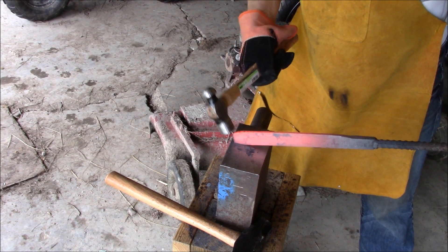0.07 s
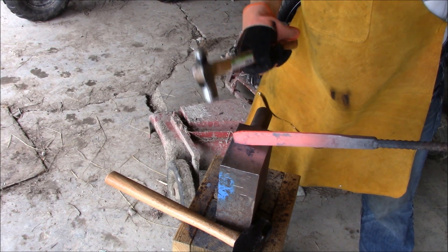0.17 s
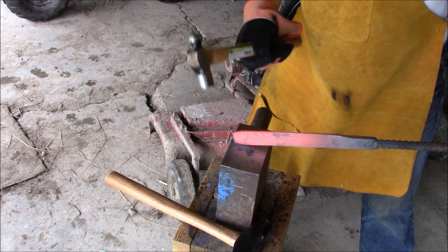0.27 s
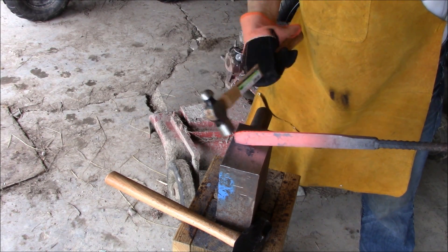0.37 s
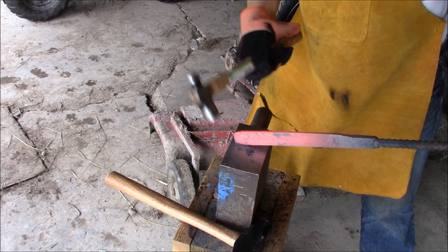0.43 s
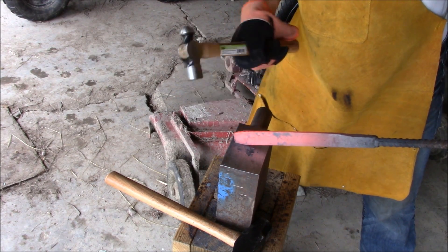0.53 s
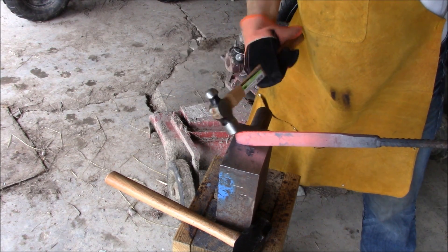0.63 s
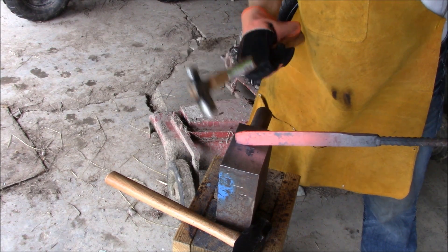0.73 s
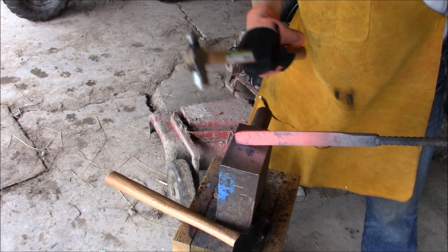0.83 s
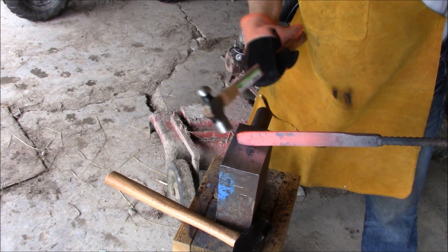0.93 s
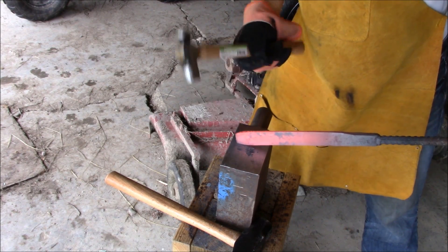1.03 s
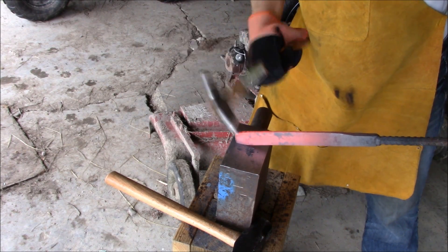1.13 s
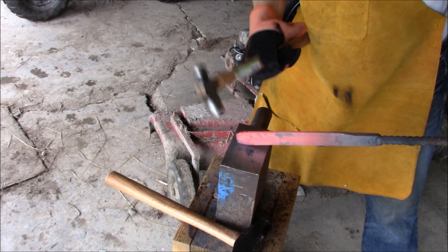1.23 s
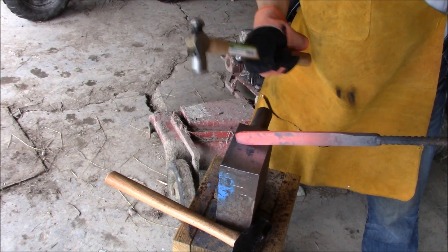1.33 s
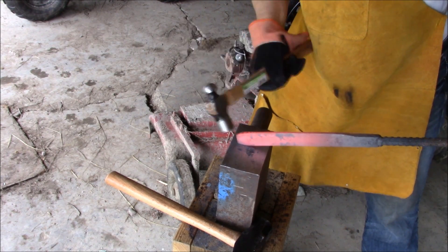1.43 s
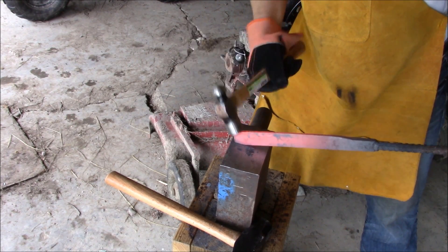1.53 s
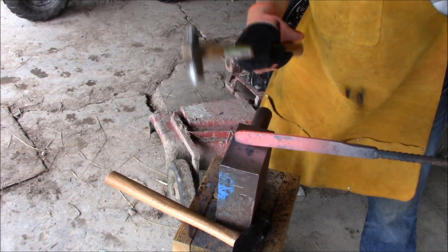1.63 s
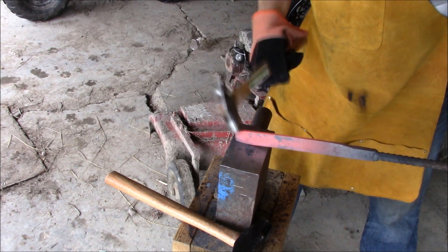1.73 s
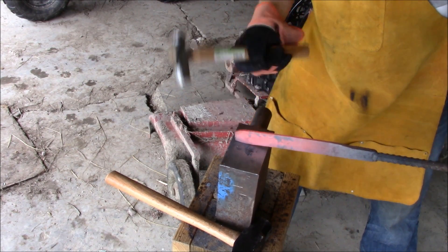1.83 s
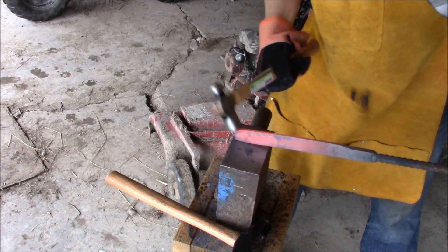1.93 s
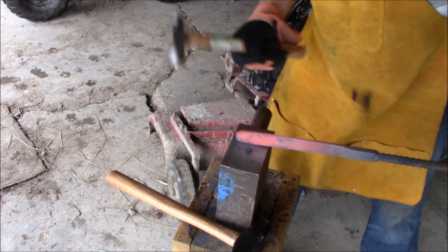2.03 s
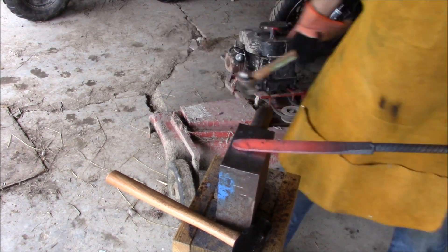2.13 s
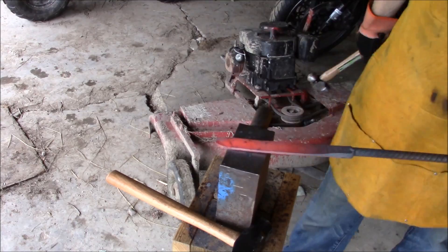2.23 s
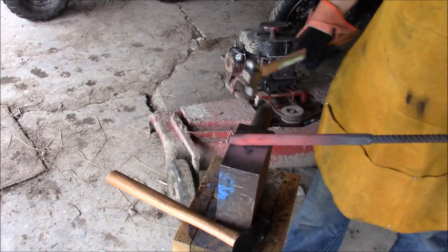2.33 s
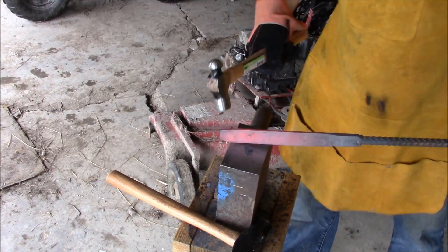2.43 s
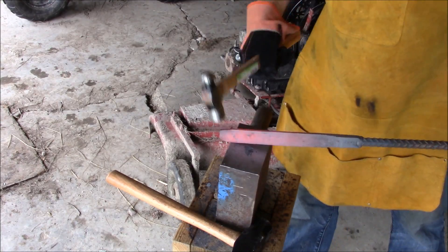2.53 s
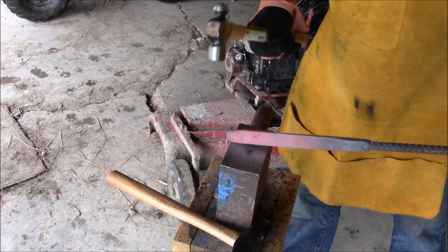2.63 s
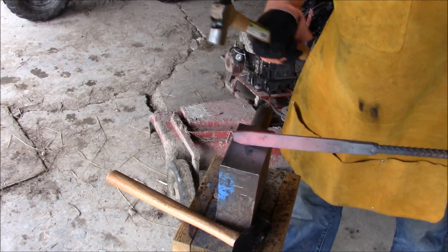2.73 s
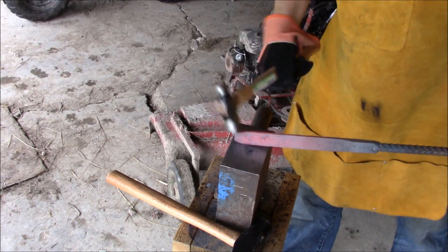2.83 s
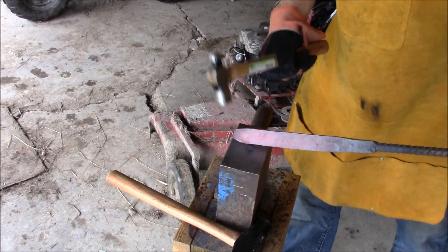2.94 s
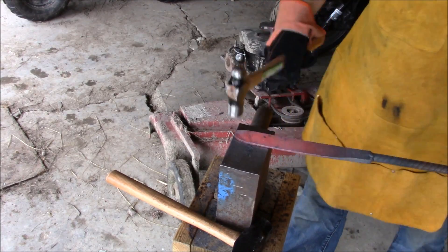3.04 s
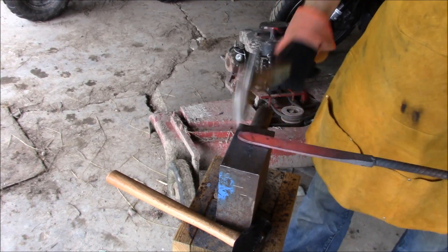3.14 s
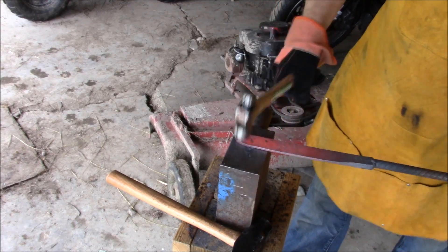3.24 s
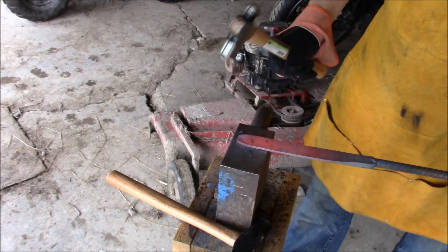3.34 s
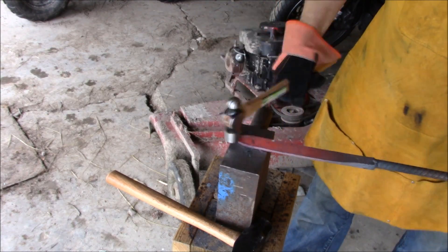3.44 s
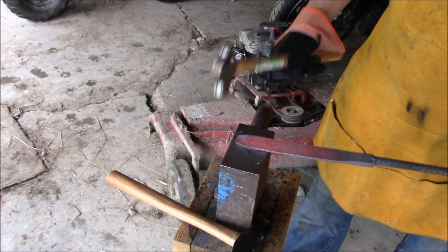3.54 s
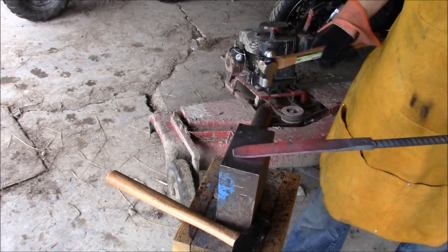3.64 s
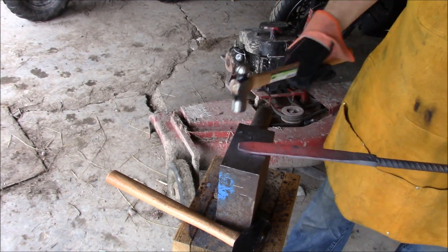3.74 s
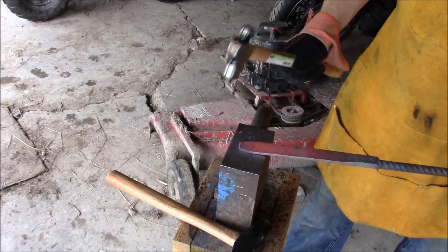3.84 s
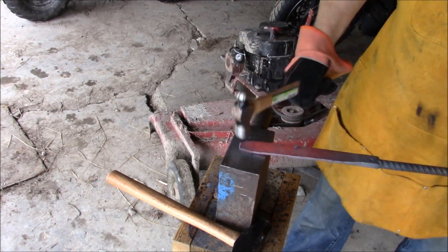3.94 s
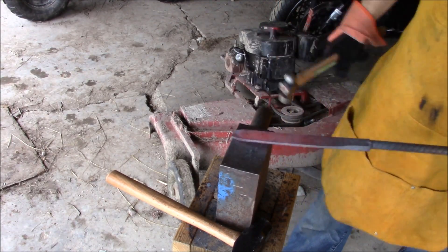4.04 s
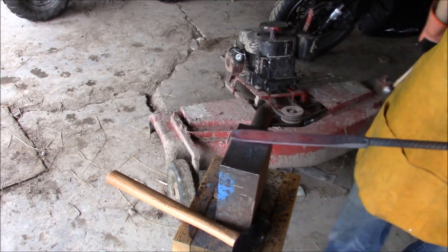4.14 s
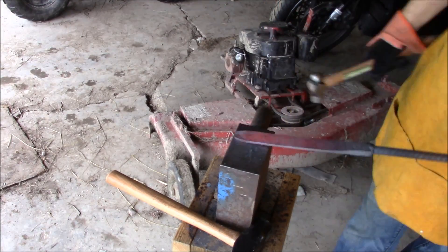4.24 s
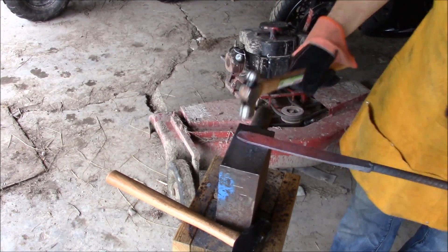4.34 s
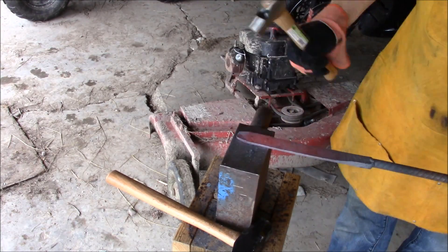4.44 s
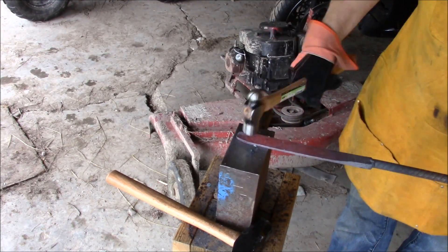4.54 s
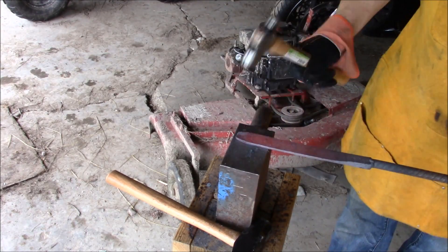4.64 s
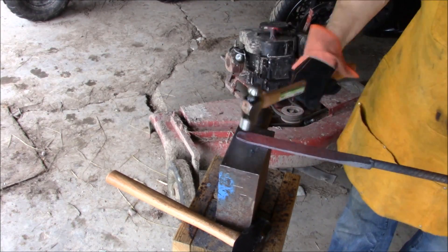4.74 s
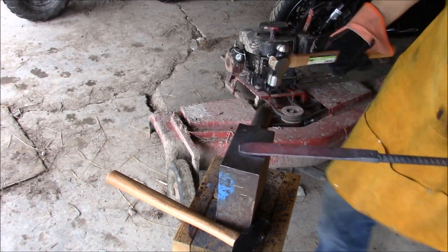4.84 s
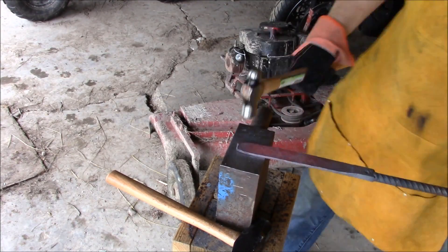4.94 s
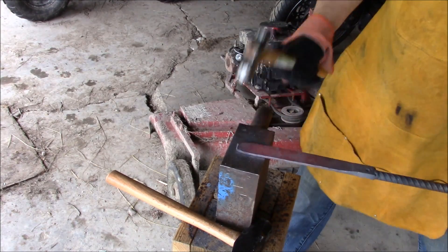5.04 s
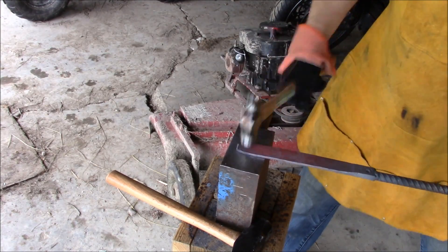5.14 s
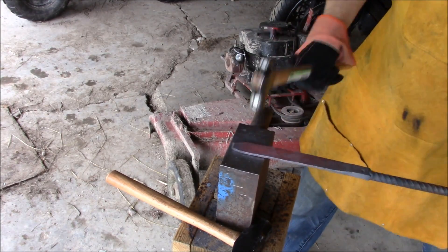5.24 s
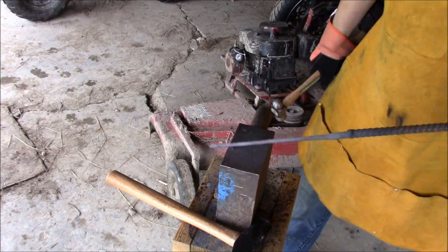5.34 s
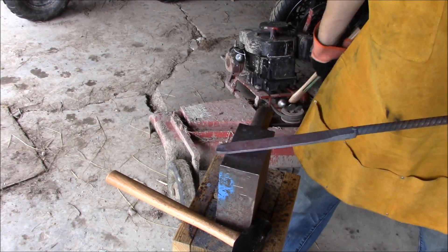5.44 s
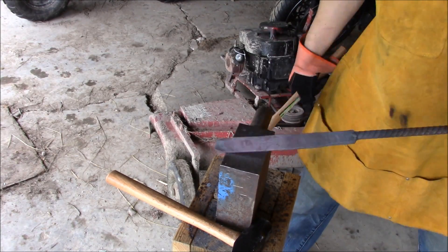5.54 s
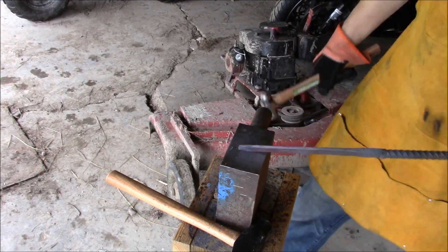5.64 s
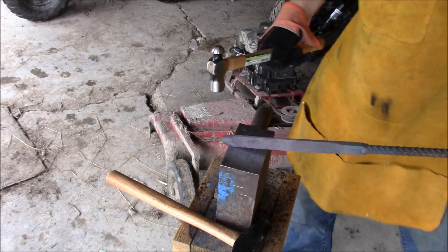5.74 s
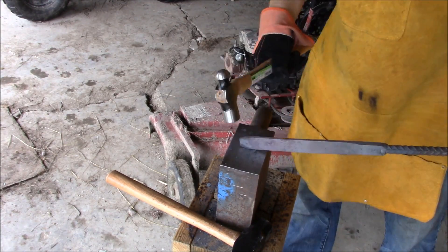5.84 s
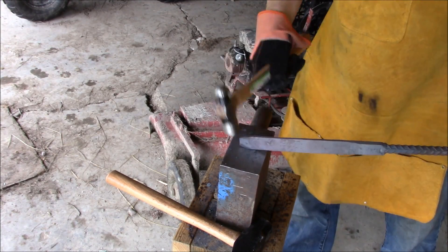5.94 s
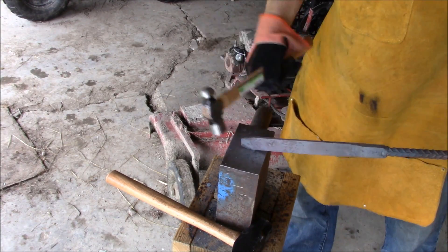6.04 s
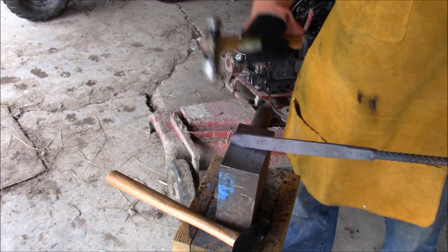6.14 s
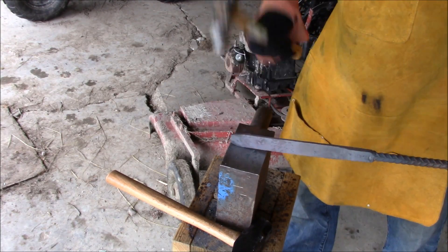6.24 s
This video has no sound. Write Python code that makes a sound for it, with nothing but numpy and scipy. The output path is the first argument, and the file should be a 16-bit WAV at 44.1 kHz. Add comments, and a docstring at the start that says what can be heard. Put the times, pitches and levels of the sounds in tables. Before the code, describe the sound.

Five dull hammer blows on hot steel over an anvil, then a tiny gap and speeded-up, high-pitched rapid clinking in bursts.

```python
"""Smith at a small anvil, close microphone

Workshop, concrete floor: a smith draws out a glowing steel bar, the microphone's gain ducking at loud blows.
Five blows pass at natural speed; after a short silence the work runs four times as fast, two octaves higher.
Between the fast runs of blows the bar clinks on the anvil and shoes scuff on the concrete.
Struck metal is a sum of decaying sines; clang, scuffs and air are shaped noise."""
import sys
import numpy as np
from scipy import signal
from scipy.fft import rfft, irfft, next_fast_len
from scipy.io import wavfile
from scipy.ndimage import map_coordinates

SR = 44100
rng = np.random.default_rng(int(sys.argv[2]) if len(sys.argv) > 2 else 0)


def bounce(signal):
    """Save signal as a 16-bit WAV file at the path given by the first command-line argument."""
    frames = np.transpose(np.atleast_2d(signal))
    limited = np.clip(frames, -1, 1)
    pcm = np.round(limited * 32767).astype(np.int16)
    wavfile.write(sys.argv[1], SR, pcm)


N = 277212

# Event times are as heard. Pitches, decays and rises of the sources are at natural speed;
# the fast stretch multiplies the pitches and divides the durations by four.

# stretches of work: from t/s, to t/s, playing speed (1 = natural)
STRETCHES = [(0, 1.56, 1), (1.592, 6.3, 4)]
# hammer blows: t/s, level/dB ahead of the gain control, lift (0 = bar flat on the anvil, 1 = clear and springing)
BLOWS = [(0.3317, -20.5, 0.52), (0.6087, -17.5, 0.38), (0.8725, -16, 0.42), (1.127, -15.5, 0.52),
         (1.3822, -15, 0.48), (1.6109, -14, 0.64), (1.6793, -15, 0.39), (1.7463, -13, 0.68),
         (1.8118, -13, 0.65), (1.8794, -13.5, .5), (1.9455, -14.5, 0.44), (2.0104, -14.5, 0.48),
         (2.0751, -13.5, 0.56), (2.5642, -28.5, 0.79), (2.7533, -17.5, 1), (2.8344, -17, 0.51),
         (2.9104, -14.5, .6), (2.9772, -12, 0.54), (3.1309, -29.5, 0.087), (3.2174, -23, .05),
         (3.2944, -13.5, 0.65), (3.3676, -14, 0.5), (3.4355, -15, .5), (3.5034, -15, 0.49),
         (3.5708, -16, 0.38), (3.8655, -23.5, .55), (3.9385, -16, 0.64), (4.0078, -17.5, .35),
         (4.4287, -23.5, 0.61), (4.5368, -17, 0.44), (4.6095, -16, .6), (4.6745, -14.5, 0.67),
         (4.7384, -17, .45), (4.8051, -15, .45), (5.0535, -23.5, 0.46), (5.1537, -13.5, 0.56),
         (5.2152, -15.5, .4), (5.2759, -16, 0.42), (5.9645, -25, 0.86), (6.0929, -18, 0.71),
         (6.2322, -22.5, .35)]
# light knocks and clinks as the bar is shifted: t/s, level/dB ahead of the gain control, brightness/dB
CLINKS = [(2.1626, -42, -2), (2.2936, -40, -20), (3.69, -43, 10.5), (3.7619, -47.5, 8.5), (4.0945, -51, 9),
          (4.1093, -45, 11), (4.3032, -47.5, 14.5), (4.882, -37, -10), (4.9075, -52.5, 18),
          (4.9734, -38, -9), (5.4281, -40.5, 6), (5.7421, -37.5, -3)]
# shoe scuffs: t/s of the peak, level/dB ahead of the gain control, rise/s
SCUFFS = [(2.240, -45, 0.056), (2.272, -36.5, 0.095), (4.205, -32, 0.11), (5.846, -31.5, 0.14)]
# anvil stand and room booming together: f/Hz, relative level/dB, t60/s
STAND_MODES = [(101.2, -17.5, 0.43), (156.2, -16, 0.55), (192.2, -10, 0.36), (206.2, -16.5, 0.27),
               (247.1, -9, 0.44), (262.9, -13.5, 0.34), (289, -14.5, 0.5), (323.1, -10, 0.36),
               (344.5, -9.5, 0.35), (372, -20.5, 0.34), (425.3, -14.5, 0.36), (479.4, -8.5, 0.31),
               (616, -18.5, 0.51), (673, -12, 0.34), (711, -12.5, 0.44), (773, -16, 0.43),
               (813, -17.5, 0.5), (832, -24, 0.64), (940, -20, 0.31), (973, -7.5, 0.25), (1022, -7.5, 0.25),
               (1050, -16, 0.52), (1163, -19.5, 0.43), (1185, -10.5, 0.34), (1420, -18, 0.29),
               (1733, -14.5, 0.41)]
# the anvil's own note: f/Hz, relative level/dB, t60/s
ANVIL_MODES = [(3003, -10.5, 0.38), (2980, -17, 0.33)]
# the bar: f/Hz, relative level/dB, t60/s
BAR_MODES = [(2140, -48, .35), (2310, -29, 0.61), (2453, -11.5, 0.26), (2580, -19.5, 0.44),
             (2590, -21, 0.48)]
# hammer head and anvil face, rung by every contact: f/Hz, relative level/dB, t60/s
STEEL_MODES = [(1970, -14, 0.22), (3190, -19, 0.42), (3700, -33, .4), (3980, -15.5, 0.25),
               (4920, -17.5, 0.44), (5000, -28, 0.45), (6020, -13, 0.26), (7130, -14, 0.29),
               (7900, -22.5, 0.35), (9500, -8.5, 0.16), (10600, -20, 0.21), (11100, -21.5, 0.28)]
# broad slope of the dense clang: f/Hz, relative level per Hz/dB
CLANG_SLOPE = [(30, -35), (70, -18.5), (130, -13.5), (240, 0.5), (520, -2), (1020, 2), (1500, -5.5),
               (2550, -6.5), (3700, -12.5), (6300, -17), (9500, -22), (12000, -23.5), (16000, -40)]
# clusters of steel modes that stand out of the clang: f/Hz, width/Hz, boost/dB
CLANG_CLUSTERS = [(4070, 130, 8), (4900, 130, 4.5), (5944, 180, 15.5), (7190, 220, 9.5), (8160, 320, 8),
                  (9500, 280, 13)]
# decay of the clang in the room: f/Hz, t60/s
ROOM_DECAY = [(100, 0.57), (260, 0.52), (700, 0.48), (1840, 0.41), (4850, 0.39), (12800, 0.27)]
# sole on gritty concrete: f/Hz, relative level per Hz/dB
GRIT_SPECTRUM = [(60, -52), (200, -5.5), (550, -2.5), (1100, -0.5), (1600, 5.5), (2300, -3.5), (4000, -7.5),
                 (16000, -30)]
# workshop air: f/Hz, relative level per Hz/dB
AIR_SPECTRUM = [(20, -10), (60, -8), (150, -3), (400, -1), (750, 0.5), (1500, -6.5), (2500, -13.5),
                (3300, -13.5), (6000, -25.5), (16000, -36)]
# stereo spread at the microphone: f/Hz, side minus mid level/dB
STEREO_WIDTH = [(125, -47), (250, -41), (1000, -38), (2000, -31), (4000, -25), (12000, -21)]
# the blows brighten as the cooling steel hardens, and ease a little at the end: t/s, brightness/dB
HARDNESS = [(0, 2.5), (2.2, 3.5), (5.2, 10), (6.3, 8)]

# level with the bar flat and with it clear; a springing bar rings instead of thudding
LIFT_THUD_DB, LIFT_BRIGHT_DB, LIFT_BAR_DB = (7.5, -4.5), (5, -4.5), (-4.5, 8)
# at its hottest the bar is soft and cushions the blows, then firms up; times as heard
SOFT_UNTIL_S, FIRMING_S = 1.09, 0.66
SOFT_THUD_DB, SOFT_RING_DB = -4.5, -13
# steady hammering seats the bar and the anvil rings; a pause beyond one beat costs up to UNSEATED_DB
ANVIL_DB, UNSEATED_DB = 2.5, -15
BEAT_S, UNSEAT_S = 0.267, 0.2  # in the smith's own time
CLINK_THUD_DB, CLINK_ANVIL_DB, CLINK_BAR_DB = 5, -2, -6.5  # the same for every clink
SCUFF_FALL_S = 0.14  # time to fall 20 dB, at natural speed
TOP_HZ = 15900


def amp(db):
    """Decibels to gain."""
    return 10 ** (np.asarray(db) / 20)


def unit(x):
    """Scale to rms 1."""
    return x / np.sqrt(np.mean(x ** 2) + 1e-20)


def noise(n):
    """White noise."""
    return rng.standard_normal(n)


def along(points, hz):
    """Read (f/Hz, value) points on a log frequency axis."""
    f, value = np.transpose(points)
    return np.interp(np.log(hz + 1), np.log(f), value)


def filtered(x, gain_db, rate):
    """Shape x by a gain that is a function of frequency."""
    m = next_fast_len(len(x) + 2048)
    gain = amp(gain_db(np.fft.rfftfreq(m, 1 / rate)))
    return irfft(rfft(x, m) * gain, m)[:len(x)]


def coloured(x, points, rate):
    """Shape x by a (f/Hz, level/dB) spectrum."""
    return filtered(x, lambda hz: along(points, hz), rate)


def wobble(t, per_s, count):
    """Random curves, straight between per_s knots a second."""
    knots = rng.standard_normal((count, 256))
    return np.array([map_coordinates(k, [t * per_s], order=1, mode="mirror") for k in knots])


def add(track, s, sound):
    """Mix a sound in at time s."""
    part = track[round(s * SR):][:len(sound)]
    part += sound[:len(part)]


def background(rate, air_db=-56.5, whine_db=-59):
    """Soft workshop air is shaped noise; a faint sine whine fades out around the first blow."""
    t = np.arange(N) / rate
    air = amp(air_db) * unit(coloured(noise(N), AIR_SPECTRUM, rate))
    swell = np.interp(t, [.08, .16, .3, .4], [0, 1, 1, 0])
    whine = swell * np.sqrt(2) * np.sin(2 * np.pi * 646 * t)
    return air + amp(whine_db) * whine


def scuffs(rows, rate, grain_db=1.5):
    """A sole slides over grit: a grainy swell of noise that fades away."""
    track = np.zeros(N)
    for s, db, rise in rows:
        t = np.arange(int(rate)) / rate - .5  # zero at the peak
        grain = amp(grain_db * wobble(t + .5, 224, count=1)[0])
        grit = unit(coloured(noise(len(t)) * grain, GRIT_SPECTRUM, rate))
        swell_db = -20 * np.where(t < 0, (t / rise) ** 2, t / SCUFF_FALL_S)
        add(track, s - .5 * rate / SR, grit * amp(db + swell_db))
    return track


def clang_db(hz):
    """Spectrum of the clang: a broad slope with clusters of steel modes on it."""
    clusters = sum(db / (1 + (2 * (hz - centre) / width) ** 2) for centre, width, db in CLANG_CLUSTERS)
    return along(CLANG_SLOPE, hz) + clusters


def dying(x, rate):
    """Each frequency dies away at the room's pace."""
    hz, t, z = signal.stft(x, rate, nperseg=128)
    decay = amp(-60 * t / along(ROOM_DECAY, hz)[:, None])
    return signal.istft(z * decay, rate, nperseg=128)[1][:len(x)]


def ring(modes, t, rate, attack, waver):
    """Modes struck at slightly new strengths; reflections make each one swell and waver."""
    audible = [mode for mode in modes if mode[0] < rate / 2]
    hz, db, t60 = np.transpose(audible)[:, :, None]
    level = amp(db + 2 * rng.standard_normal(hz.shape) - 60 * t / t60)
    phase = 2 * np.pi * (hz * t + rng.random(hz.shape))
    tone = np.sin(phase) * (1 + waver * wobble(t, 46.0, count=len(hz)))
    tone += np.cos(phase) * waver * wobble(t, 45.9, count=len(hz))
    return np.sum(level * tone, 0) * (1 - np.exp(-t / attack))


def strikes(rows, rate, direct_db, direct_s, alike, body_db):
    """Steel on steel: a crack, the clang filling the room, and ringing stand, steel, anvil and bar."""
    track = np.zeros(N)
    t = np.arange(int(.55 * rate)) / rate
    echoes = noise(len(t))  # the part of the walls' answer that every strike shares
    crack_spectrum = [(200, -14), (700, -3.5), (2800, -9.5), (8000, -9.0), (16000, -29.5)]
    for s, db, thud_db, bright_db, anvil_db, bar_db in rows:
        answer = np.sqrt(alike) * echoes + np.sqrt(1 - alike) * noise(len(t))
        clang = unit(filtered(answer, clang_db, rate))
        tilt = [(250, thud_db), (600, 0.012), (1100, 0.0053), (2200, bright_db)]
        clang = dying(coloured(clang, tilt, rate), rate)
        crack = unit(coloured(noise(len(t)), crack_spectrum, rate))
        crack *= amp(direct_db + bright_db / 2) * np.exp(-t / direct_s)
        stand = amp(body_db + thud_db / 2) * ring(STAND_MODES, t, rate, attack=0.02, waver=0.31)
        steel = ring(STEEL_MODES, t, rate, attack=0.0016, waver=1.0)
        anvil = amp(anvil_db) * ring(ANVIL_MODES, t, rate, attack=0.035, waver=1.0)
        bar = amp(bar_db) * ring(BAR_MODES, t, rate, attack=0.0012, waver=0.37)
        add(track, s, amp(db) * (clang + crack + stand + steel + amp(bright_db) * (anvil + bar)))
    return track


def taps(rows):
    """The bar's light touches are set apart only by strength and brightness."""
    return [(s, db, CLINK_THUD_DB, bright_db, CLINK_ANVIL_DB, CLINK_BAR_DB) for s, db, bright_db in rows]


def blows(rows, speed):
    """How each hammer blow sounds, from the bar's heat, its lift off the anvil and the pause before it."""
    s, db, lift = np.transpose(rows)
    by_lift = lambda ends: np.interp(lift, [0, 1], ends)
    soft = np.clip(1 - (s - SOFT_UNTIL_S) / FIRMING_S, 0, 1)
    pause = np.maximum(np.diff(s, prepend=s[0]) * speed - BEAT_S, 0)
    unseated = 1 - np.exp(-pause / UNSEAT_S)
    thud_db = by_lift(LIFT_THUD_DB) + SOFT_THUD_DB * soft
    bright_db = by_lift(LIFT_BRIGHT_DB) + np.interp(s, *np.transpose(HARDNESS))
    anvil_db = ANVIL_DB + UNSEATED_DB * unseated + SOFT_RING_DB * soft
    bar_db = by_lift(LIFT_BAR_DB) + SOFT_RING_DB * soft
    return zip(s, db, thud_db, bright_db, anvil_db, bar_db)


def low_cut(x, rate, corner_hz=85):
    """The microphone passes little deep bass."""
    return signal.sosfilt(signal.butter(2, corner_hz, "high", fs=rate, output="sos"), x)


def gain_control(x, rate, limit_db=-16, release_db_per_s=135, attack=0.00053, sense_s=0.0011):
    """The gain drops within milliseconds of a loud blow and recovers at a steady pace in dB."""
    def lagging(v, s):
        keep = np.exp(-1 / (s * rate))
        return signal.lfilter([1 - keep], [1, -keep], v)

    power_db = 10 * np.log10(lagging(x ** 2, sense_s) + 1e-12)
    over_db = np.maximum(power_db - limit_db, 0)
    recovery = release_db_per_s * np.arange(N) / rate
    cut_db = np.maximum.accumulate(over_db + recovery) - recovery
    return x * amp(-lagging(cut_db, attack))


def soft_clip(x):
    """Peaks that outrun the gain control are rounded off below 0.6."""
    return x / (1 + np.abs(x / .6) ** 4) ** (1 / 4)


def workshop(start, end, speed, hurried_db=-0.5):
    """One stretch at the microphone; fewer samples per second of work play it faster, higher, a bit softer."""
    rate = SR / speed
    within = lambda rows: [row for row in rows if start <= row[0] < end]
    sound = background(rate) + scuffs(within(SCUFFS), rate)
    sound += strikes(taps(within(CLINKS)), rate, direct_db=3.5, direct_s=0.0056, alike=0.17, body_db=-5.5)
    hammer = blows(within(BLOWS), speed)
    sound += strikes(hammer, rate, direct_db=2, direct_s=0.014, alike=0.35, body_db=2.0)
    heard = soft_clip(gain_control(low_cut(sound, rate), rate)) * amp(hurried_db * (speed > 1))
    t = np.arange(N) / SR
    return heard * ((t >= start) & (t < end))


def scene():
    """The two stretches in turn; the close microphone ports differ only by faint early reflections."""
    mid = sum(workshop(*stretch) for stretch in STRETCHES)
    early = noise(256) * np.exp(-np.arange(256) / 64)
    reflected = signal.fftconvolve(mid, early / np.linalg.norm(early))[:N]
    side = coloured(reflected, STEREO_WIDTH, SR)
    return np.array([mid + side, mid - side])


def record(dry):
    """A steep low-pass leaves next to nothing above the band limit."""
    m = next_fast_len(N + SR // 2)
    passed = 1 / (1 + (np.fft.rfftfreq(m, 1 / SR) / TOP_HZ) ** 80)
    return irfft(rfft(dry, m) * passed, m)[:, :N]


dry = scene()
out = record(dry)
bounce(out)
```